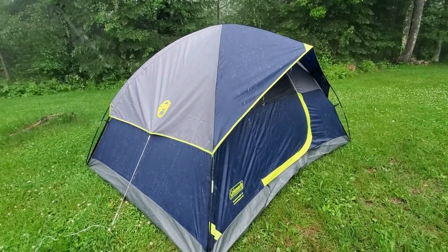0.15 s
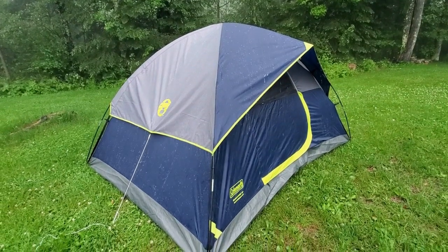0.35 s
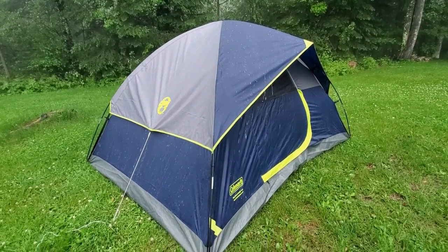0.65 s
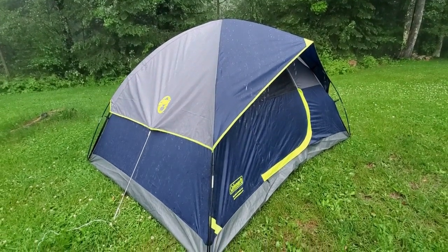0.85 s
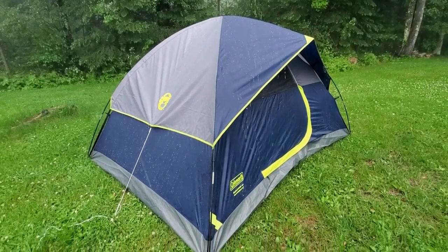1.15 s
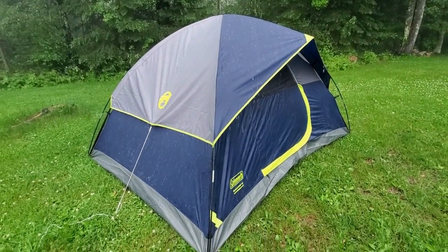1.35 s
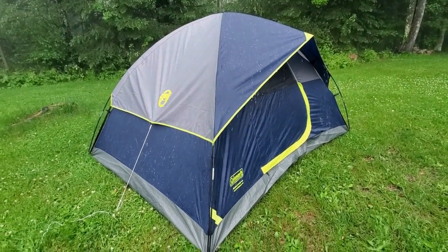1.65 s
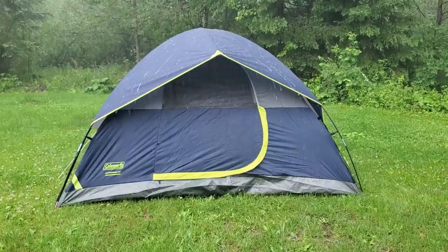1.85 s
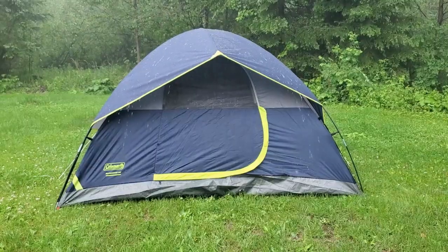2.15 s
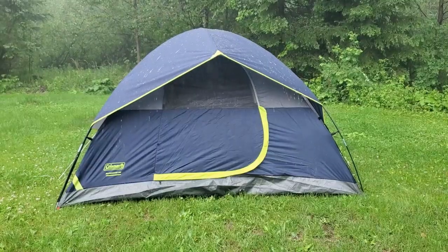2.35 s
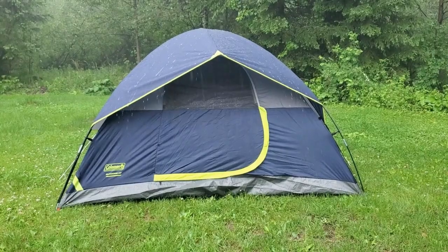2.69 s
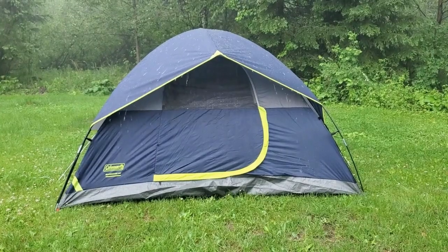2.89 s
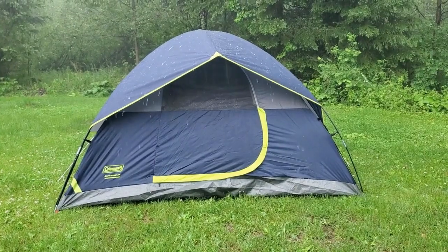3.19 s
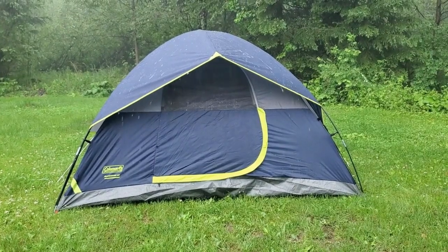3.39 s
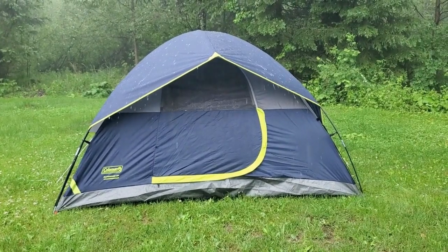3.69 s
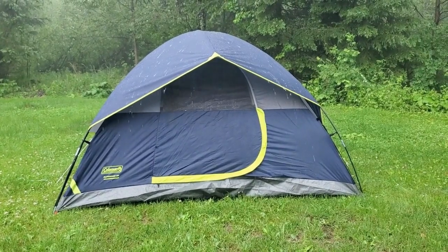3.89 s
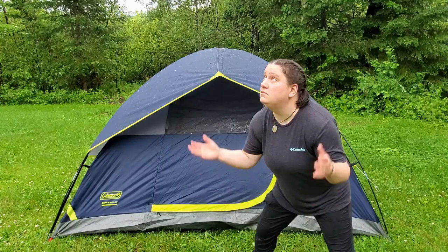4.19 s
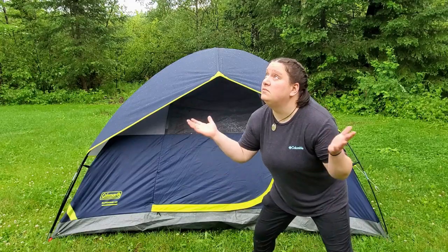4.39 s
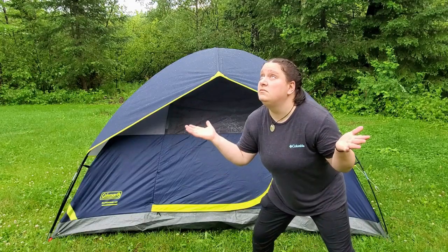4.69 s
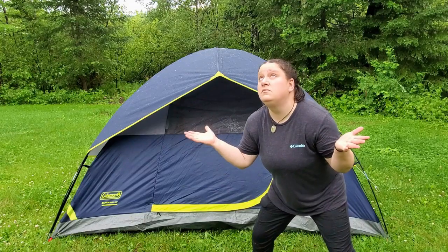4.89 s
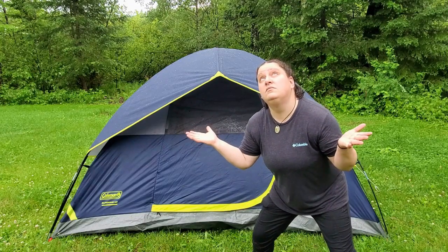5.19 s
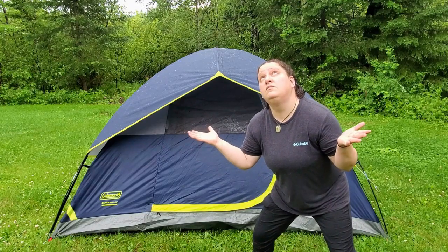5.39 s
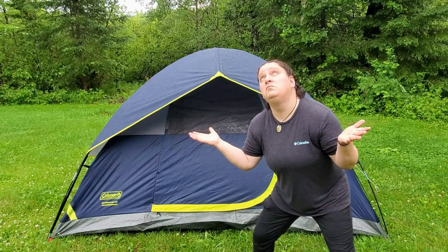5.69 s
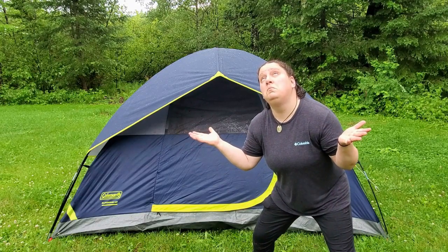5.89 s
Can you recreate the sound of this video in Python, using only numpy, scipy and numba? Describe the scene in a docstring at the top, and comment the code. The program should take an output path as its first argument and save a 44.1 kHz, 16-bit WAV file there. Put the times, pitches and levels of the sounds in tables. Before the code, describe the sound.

A downpour on tent cloth and grass, with close drops, stops abruptly, leaving soft air, light breeze and far birdsong.

```python
"""Heavy rain patters on a tent and grass, the taut cloth drumming under it and single drops bursting
close to a small two-port camera microphone. A short mute, then a second stand, where water blocks
the right port and leaves that side dull and hollow. After another mute the rain is over: a quiet
meadow in mono, a breeze rumbling on the microphone, far birds smeared by the trees."""
import sys
import numpy as np
from scipy import signal
from scipy.fft import rfft, irfft, next_fast_len
from scipy.io import wavfile
from scipy.ndimage import uniform_filter1d
from numba import njit

SR = 44100
rng = np.random.default_rng(int(sys.argv[2]) if len(sys.argv) > 2 else 0)


def wav_record(signal):
    """Record a signal, one row per channel, as 16-bit PCM in the file named by sys.argv[1]."""
    frames = np.transpose(np.atleast_2d(signal))
    bounded = np.clip(frames, -1, 1)
    # unit amplitude maps onto the largest positive 16-bit level
    quanta = np.round(bounded * 32767).astype(np.int16)
    wavfile.write(sys.argv[1], SR, quanta)


N = 266805

# when each stand is heard: (on [s], off [s])
STANDS = [(0, 1.7021), (1.7361, 4.0917), (4.1025, 7)]
# rain at each of the two wet stands: (time [s], patter level at the left port [dB], drumming level [dB])
RAIN_LEVELS = [
    [(0, -23.5, -29.5), (.27, -21, -31), (.45, -21.5, -26), (1.0, -21, -26), (1.5, -20.5, -25),
     (1.7, -22, -28)],
    [(1.74, -29, -29), (2.28, -28.5, -32), (2.7, -25.5, -31), (3.11, -22, -27), (3.5, -23.5, -25),
     (3.88, -22.5, -27.5), (4.09, -22.5, -26.5)],
]
# colour of the patter by stand and port: (frequency [Hz], spectral level [dB])
FIRST_STAND_LEFT = [(250, -7.5), (450, -4.5), (700, -1.5), (950, 0), (1130, -4), (1700, 0), (2400, 0.5),
                    (4200, -2), (7200, -16), (8300, -12.5), (9500, -15), (11200, -6.5), (13500, -12.5),
                    (14800, -9.5), (15800, -7)]
FIRST_STAND_RIGHT = [(250, -8.5), (450, -10), (720, -0.5), (1150, -6.5), (1600, -6.5), (2300, -5),
                     (3250, 0), (3900, -7), (6500, -10.5), (8000, -15.5), (8900, -12), (10200, -13),
                     (11300, -9), (14500, -12.5), (15800, -37)]
SECOND_STAND_BOTH = [(250, -15), (450, -6), (650, -9.5), (950, -5.5), (1270, -8), (2000, -5), (2700, -2.5),
                     (4400, -3.5), (7300, -11.5), (8000, -10), (9500, -12), (11100, -5.5), (12300, -10),
                     (14500, -5), (15800, -12)]
# colour of the drumming tent cloth: (frequency [Hz], spectral level [dB])
CLOTH_COLOUR = [(5, -80), (18, -43), (28, -23), (50, -2.5), (70, -4.5), (110, -0.5), (155, 0), (205, -8),
                (268, -4.5), (330, -10.5), (420, -10.5), (600, -26.5), (1200, -47)]
# big drops that boom on the cloth: (time [s], level [dB], pitch [Hz])
THUMPS = [(.598, -19, 135), (0.65, -15, 159), (.927, -13, 118), (.998, -10.5, 114), (1.178, -17, 110),
          (1.477, -12, 164), (2.046, -17, 142), (3.122, -13, 110), (3.234, -17, 145), (3.384, -16, 141),
          (3.53, -13, 152), (3.615, -12, 164), (3.897, -17.5, 132)]
# drops bursting close by: (time [s], level [dB], pitch [Hz], ring [cycles], left minus right [dB])
SPLASHES = [(.0932, -2.5, 11400, 13, -13), (.1093, -4, 15400, 18, 14.5), (.1093, -9, 10000, 15, 12),
            (.279, -10, 2700, 9, 2), (.6484, -11, 11900, 12, 5), (.8028, -7, 13000, 10, -8),
            (.9739, -5, 13900, 12, -6), (1.0274, -10, 12500, 12, -2), (1.2705, -15, 3700, 6, 8),
            (1.5209, -14, 6000, 6, 5), (1.984, -6, 14500, 15, 3), (2.2032, -5.5, 4400, 18, 15),
            (2.2218, -10, 3500, 5, 5), (2.343, -11.5, 3700, 10, 3), (2.355, -1.5, 12800, 15, 3),
            (2.438, -20, 850, 7.2, 5), (2.4629, -6.5, 1900, 4, -17), (2.4661, -6, 14500, 15, 3),
            (2.5463, -1, 14500, 15, 3), (2.6707, -7, 14900, 15, 3), (2.7573, -15, 5500, 6, 3),
            (2.7815, -6.5, 1700, 5.5, 3.5), (3.578, -8.5, 1500, 6, 9), (3.6426, -6, 14600, 12, 3),
            (3.654, -4, 1800, 5, 9), (3.8165, -3, 11100, 14, 3), (3.848, -3, 14500, 18, 3),
            (3.8871, -4, 14500, 15, 3)]
# far birds in the trees: (time [s], length [s], start pitch [Hz], end pitch [Hz], level [dB])
BIRD_NOTES = [(4.625, 0.031, 5850, 5470, -57), (4.665, 0.038, 5320, 4790, -53.5),
              (4.69, 0.048, 4000, 3050, -62), (4.713, .043, 5330, 4860, -56),
              (4.759, 0.059, 3525, 3640, -58), (4.795, .04, 5400, 4600, -54),
              (4.839, 0.033, 4600, 3200, -53), (4.855, 0.048, 5500, 4500, -53),
              (4.885, .054, 3470, 3300, -61), (4.905, .055, 5430, 4390, -57),
              (4.94, .045, 3600, 2540, -50.5), (4.997, .04, 2456, 2810, -51), (5.03, .046, 3030, 3320, -52),
              (5.058, .049, 2790, 2550, -58.5), (5.105, .057, 3330, 3190, -56),
              (5.19, .035, 3250, 3200, -67), (5.84, .045, 4250, 4600, -65), (5.878, .13, 4750, 4800, -57.5),
              (5.92, .07, 4350, 3950, -61), (5.998, 0.063, 3950, 2860, -59), (6.01, .04, 4150, 4100, -64)]
# puffs of breeze on the microphone: (time [s], level [dB])
PUFFS = [(4.19, -53), (4.445, -52), (4.6, -61), (4.88, -60), (5.2, -63), (5.4, -63), (5.635, -57),
         (5.9, -58), (6.04, -61)]
# colour of their rumble: (frequency [Hz], spectral level [dB])
BREEZE_COLOUR = [(15, -42), (30, -12), (55, -1.5), (95, -0.5), (140, -17), (250, -33), (600, -70)]
# colour of far leaves and air: (frequency [Hz], spectral level [dB])
MEADOW_COLOUR = [(20, -29), (45, 1), (110, 1), (170, -4.5), (450, -5), (1000, -9), (1700, -17.5),
                 (5000, -18), (9000, -24.5), (11000, -32), (16500, -33)]


def rain(flutter_db=1.18, top_hz=15920):
    """Patter, drumming and near drops as they reach the microphone at the two wet stands."""
    white = patter() * undb(0.68 * wander(8.61))
    cloth = drumming() * undb(flutter_db * wander(14))
    drops = near_drops()
    at_first = np.array([colour(white[0], FIRST_STAND_LEFT), colour(white[1], FIRST_STAND_RIGHT)])
    at_second = colour(white, SECOND_STAND_BOTH)
    stands = []
    for ports, levels in zip((at_first, at_second), RAIN_LEVELS):
        patter_gain, cloth_gain = gain_curves(levels)
        stands.append(ports / np.std(ports[0]) * patter_gain + cloth * cloth_gain + drops)
    first, second = stands
    second[1] = wet_port(second[1])
    top_cut = signal.ellip(10, .2, 60, top_hz, fs=SR, output="sos")
    low_cut = signal.butter(2, 22, "high", fs=SR, output="sos")  # the ports pass no slow pressure
    band = np.vstack([top_cut, low_cut])
    return signal.sosfilt(band, first), signal.sosfilt(band, second)


def patter():
    """Rain all around: long waves reach both ports alike, short ones are each port's own."""
    both, left, right = (shower(count=60000, lo_hz=291, hi_hz=16500, cycles=6.2, spread_db=2, hiss_db=2)
                         for _ in range(3))
    low, high = (signal.butter(2, 1050, kind, fs=SR, output="sos") for kind in ("low", "high"))
    shared = signal.sosfilt(low, both) * undb(1.2 * wander(14))
    late = np.roll(shared, shift=4)  # four samples later at the right port
    return np.array([shared, late]) + signal.sosfilt(high, np.array([left, right]))


def drumming():
    """The taut tent cloth booms under the rain, nearly the same at both ports."""
    hits = (shower(count=5000, lo_hz=30.4, hi_hz=687, cycles=7.3, spread_db=1, hiss_db=-40)
            for _ in range(2))
    mid, side = (unit(colour(x, CLOTH_COLOUR)) for x in hits)
    return mid + undb(-16) * side * np.array([[1], [-1]])


def near_drops():
    """Close drops: thumps on the cloth reach both ports alike, splashes favour the nearer one."""
    s, db, hz = np.transpose(THUMPS)
    thumps = ringing_drops(N, s * SR, hz, np.full(len(s), 7.5), undb(db))
    s, db, hz, cycles, pan_db = np.transpose(SPLASHES)
    port_gains = (undb(db + np.minimum(side * pan_db, 0)) for side in (1, -1))
    return thumps + np.array([ringing_drops(N, s * SR, hz, cycles, gain) for gain in port_gains])


def shower(count, lo_hz, hi_hz, cycles, spread_db, hiss_db):
    """Drops of scattered pitch and size over the hiss of far ones; roughly white."""
    when, pitch, size = rng.random((count, 3)).T
    hz = lo_hz * (hi_hz / lo_hz) ** pitch
    amplitude = hz * undb(-spread_db * np.log(size))
    drops = ringing_drops(N, when * N, hz, np.full(count, float(cycles)), amplitude)
    return unit(unit(drops) + undb(hiss_db) * rng.standard_normal(N))


@njit
def ringing_drops(length, start, hz, cycles, amplitude):
    """Each drop is a sine that dies by 50 dB within its cycles."""
    out = np.zeros(length)
    for k in range(len(start)):
        ring = int(cycles[k] * SR / hz[k])
        step = np.exp(2j * np.pi * hz[k] / SR - np.log(316.) / max(ring, 1))
        phasor = amplitude[k] + 0j
        for i in range(int(start[k]), min(int(start[k]) + ring, length)):
            out[i] += phasor.imag
            phasor *= step
    return out


def wet_port(x, hz=1130, q=4.7, gain_db=-2):
    """Water over the port turns it into a cavity: a resonance, then 12 dB an octave down."""
    w = 2 * np.pi * hz
    b, a = signal.bilinear([w * w], [1, w / q, w * w], SR)
    return undb(gain_db) * signal.lfilter(b, a, x)


def birds():
    """Far gliding whistles, roughened by a quick warble and throb."""
    song, warble = np.zeros(N), wander(700)
    throb = undb(3 * wander(300))
    for s, length, start_hz, end_hz, db in BIRD_NOTES:
        depth = 0.025 + 0.12 * abs(np.log2(end_hz / start_hz))  # wide glides warble more
        i = np.arange(int(s * SR), min(int((s + length) * SR), N))
        progress = (i / SR - s) / length
        hz = (start_hz + (end_hz - start_hz) * progress) * (1 + depth * warble[i])
        envelope = undb(db) * np.sqrt(np.abs(np.sin(np.pi * progress)))
        song[i] += envelope * np.sin(2 * np.pi * np.cumsum(hz) / SR)
    return song * throb


def trees(song, t60_s=0.4, direct_db=-4):
    """Trunks and leaves scatter far song into a short wash, stronger than the direct path."""
    t = np.arange(SR // 2) / SR
    wash = rng.standard_normal(len(t)) * undb(-60 * t / t60_s)
    return undb(direct_db) * song + signal.fftconvolve(song, wash / np.linalg.norm(wash))[:N]


def breeze(half_width_s=0.034, lull_db=-70):
    """Wind on the microphone: a low rumble that swells and sinks with each puff."""
    t = np.arange(N) / SR
    gain = undb(lull_db) + sum(undb(db) * np.exp(-((t - s) / half_width_s) ** 2) for s, db in PUFFS)
    return gain * unit(colour(rng.standard_normal(N), BREEZE_COLOUR))


def meadow_air(level_db=-59):
    """The nearly steady hush of far leaves and air."""
    return unit(colour(rng.standard_normal(N), MEADOW_COLOUR)) * undb(level_db + .5 * wander(8))


def heard_between(on, off, edge_s=.00041, trace_db=-24, trace_t60_s=.03):
    """The sound starts at once and stops abruptly, its last trace gone in a few hundredths of a second."""
    t = np.arange(N) / SR
    heard = np.clip(np.minimum(t - on, off - t) / edge_s + 1, 0, 1)
    trace = (t > off) * undb(trace_db - 60 * np.maximum(t - off, 0) / trace_t60_s)
    return np.maximum(heard, trace)


def undb(db):
    return 10 ** (np.asarray(db) / 20)


def unit(x):
    return x / np.sqrt(np.mean(x ** 2))


def gain_curves(rows):
    """One gain over time for each level column of (time [s], level [dB], ...) rows."""
    s, *columns = np.transpose(rows)
    return undb([np.interp(np.arange(N) / SR, s, db) for db in columns])


def colour(x, points):
    """Shape by a spectrum of (frequency [Hz], level [dB]) points."""
    size = next_fast_len(N)
    hz, db = np.transpose(points)
    bin_hz = np.maximum(np.arange(size // 2 + 1) * SR / size, 1)
    gain = undb(np.interp(np.log(bin_hz), np.log(hz), db))
    return irfft(rfft(x, size) * gain, size)[..., :N]


def wander(per_s):
    """Smooth random drift, spread 1."""
    hold = int(SR / per_s)
    steps = np.repeat(rng.standard_normal(N // hold + 1), hold)
    return unit(uniform_filter1d(uniform_filter1d(steps, hold), hold)[:N])


def scene():
    """Two stands in the rain by the tent, then one in the meadow."""
    first, second = rain()
    meadow = meadow_air() + breeze() + trees(birds())
    return sum(x * heard_between(on, off) for x, (on, off) in zip((first, second, meadow), STANDS))


def record(dry, top_hz=16700):
    """The top is cut steeply."""
    return signal.sosfilt(signal.ellip(10, .2, 70, top_hz, fs=SR, output="sos"), dry)


dry = scene()
out = record(dry)
wav_record(out)
```